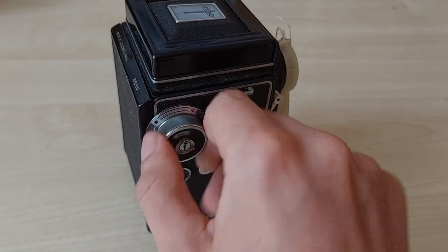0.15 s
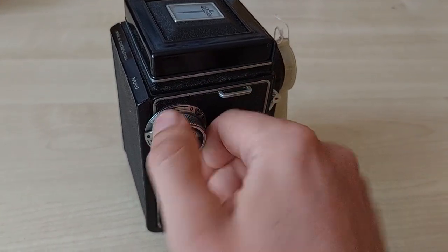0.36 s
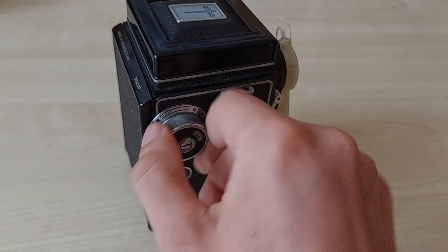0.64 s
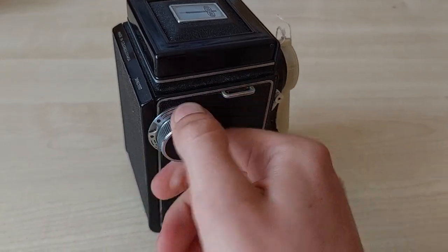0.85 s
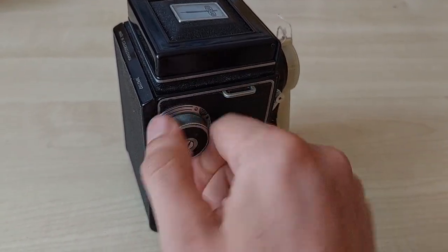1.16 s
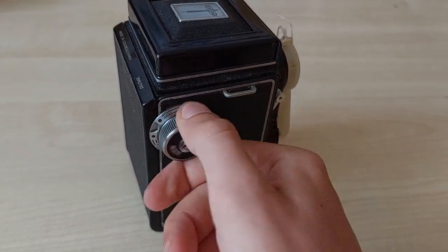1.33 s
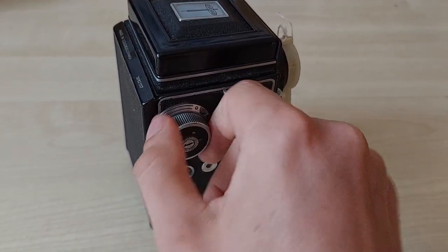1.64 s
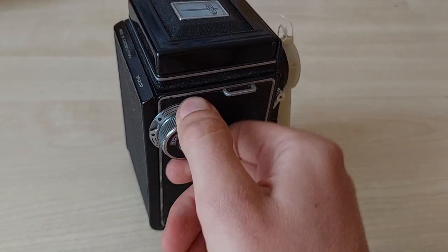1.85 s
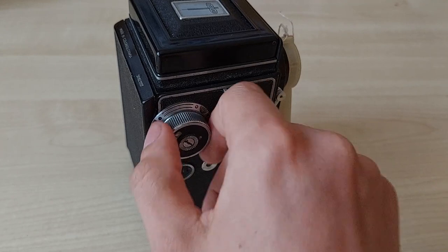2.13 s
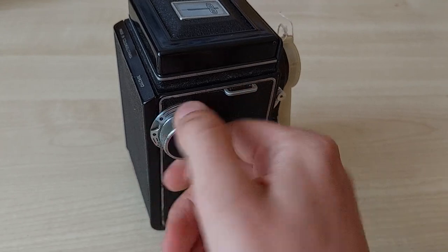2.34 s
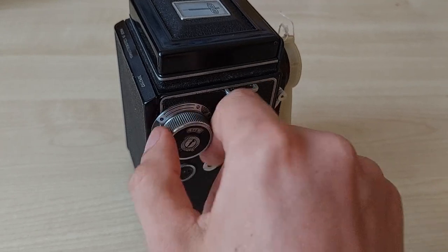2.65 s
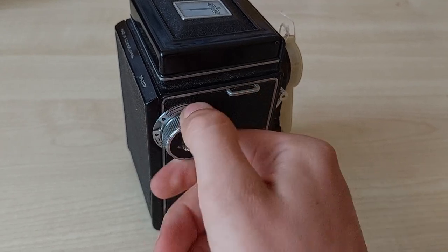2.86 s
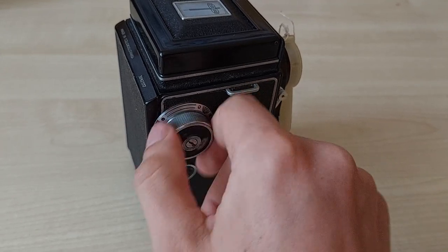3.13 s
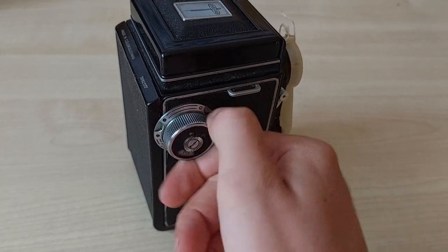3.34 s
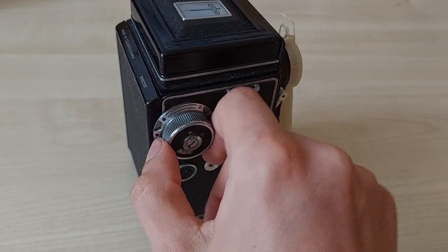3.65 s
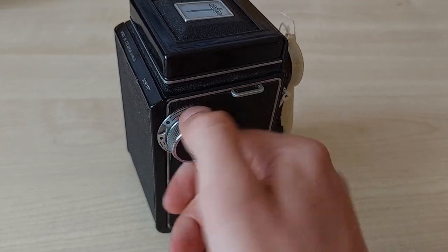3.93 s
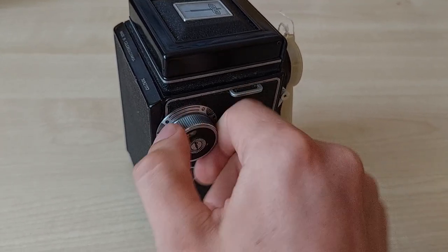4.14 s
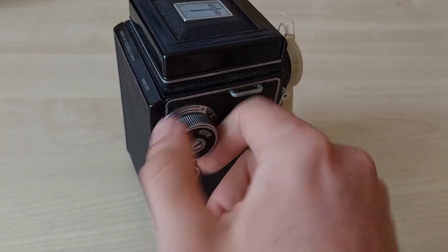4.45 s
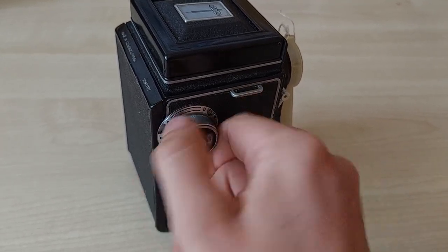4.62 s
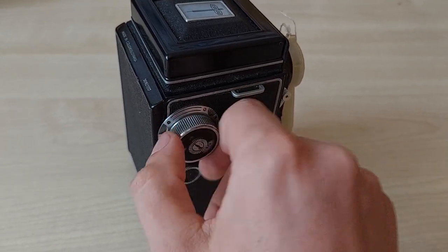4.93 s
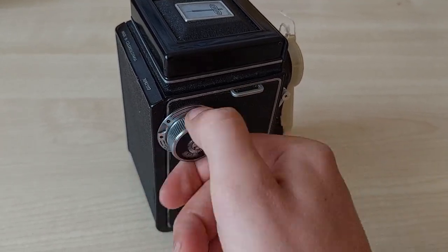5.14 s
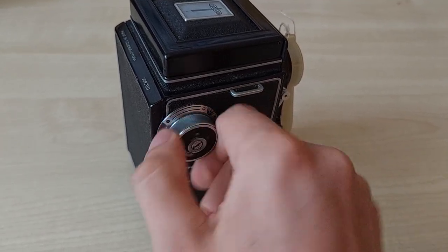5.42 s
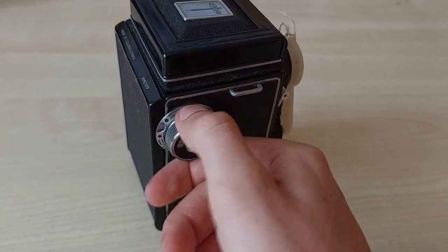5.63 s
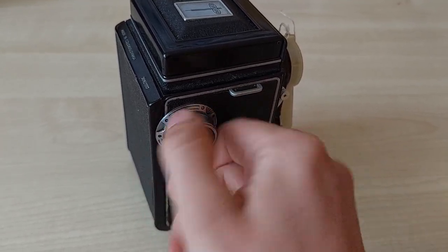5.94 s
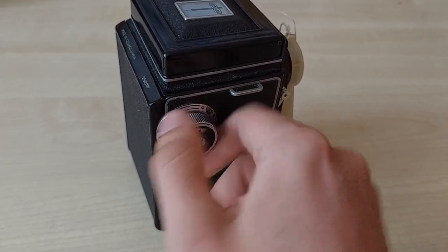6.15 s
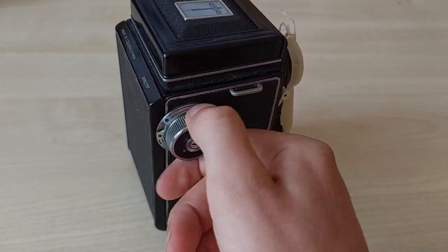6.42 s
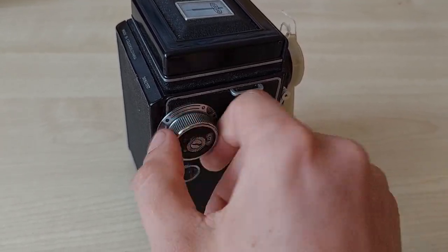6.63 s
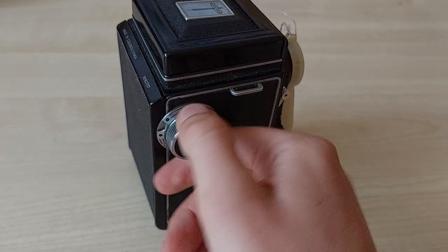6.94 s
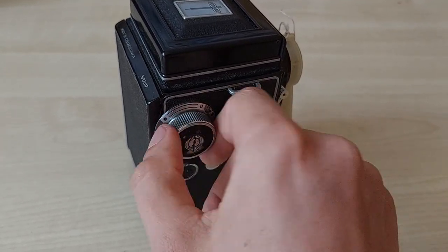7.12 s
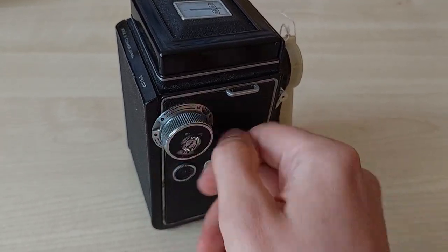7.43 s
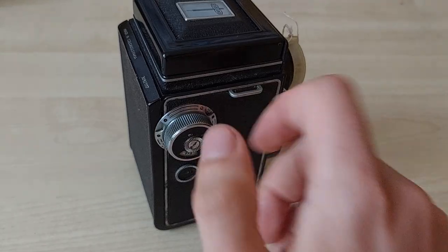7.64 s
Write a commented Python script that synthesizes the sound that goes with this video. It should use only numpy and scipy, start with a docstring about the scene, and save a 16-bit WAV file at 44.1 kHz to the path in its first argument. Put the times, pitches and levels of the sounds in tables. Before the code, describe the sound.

A hand winds a small camera's knob in short twists, with dry gear rub, uneven ratchet ticks and sharp metallic snaps on a wooden table.

```python
"""In a quiet room, on a wooden table, a hand winds the knurled knob of a small box camera.
Twists rub film and gears: random slips excite the resonances of metal and case. The ratchet pawl
ticks and now and then snaps: brief contacts set the metal ringing and knock the side plate.
Dull knocks ring as modes of the table top, cut short, over room tone and microphone hiss. In the close
stereo pair the camera reaches the left first, the table the right; the level fades down at the end."""
import sys
import numpy as np
from scipy import signal
from scipy.fft import rfft, irfft
from scipy.io import wavfile

SR = 44100
rng = np.random.default_rng(int(sys.argv[2]) if len(sys.argv) > 2 else 0)


def pcm_store(signal):
    """Save signal as 16-bit PCM."""
    levels = np.round(np.clip(np.atleast_2d(signal), -1, 1) * 32767)
    wavfile.write(sys.argv[1], SR, levels.astype(np.int16).T)


N = 343098
TIME = np.arange(N) / SR

# All levels are relative: the layers add their own trims.
# Room tone and microphone hiss, spectrum: hz, level_db
QUIET_SPECTRUM = [(15, -46.5), (25, -19), (55, 4), (123, -1), (179, -6), (248, -5), (425, -19),
                  (473, -15.5), (710, -17), (1010, -22), (3490, -30), (11100, -30.5), (15800, -32)]
# Modes of the table top: hz, level_db, t60_s (before the ringing is cut short)
TABLE_MODES = [(61.6, -19.5, .5), (110.2, -16, 0.72), (121.96, 2, 0.29), (171.7, -14, 0.31),
               (206.3, -5, 0.25), (230.5, -7.5, 0.5), (259, -10, 0.24), (291.6, -3.5, 0.28),
               (322.3, -7.5, 0.26), (422.4, -12.5, 0.11), (453, -22, 0.32), (645, -16.5, 0.11)]
# Dull knocks through the table: start_s, level_db
THUDS = [(0.117, -17), (0.621, -33.5), (1.286, -35.5), (1.708, -18.5), (2.01, -44.5), (2.832, -40),
         (3.297, -32.5), (3.731, -33.5), (4.461, -43), (4.892, -40.5), (5.206, -34), (6.93, -39.5),
         (7.231, -17), (7.468, -18.5)]
# Fingers let go and grip the knurl again: start_s, skin_hiss_db, case_hum_db, table_tremor_db
GRIPS = [(.44, -76.5, -69, -62), (1.51, -63.5, -78, -62.5), (2.03, -93, -94, -58.5),
         (2.53, -83.5, -80, -60.5), (3.01, -75, -72.5, -74.5), (3.51, -71, -84, -63),
         (4.03, -82, -78, -70.5), (4.46, -74.5, -77.5, -60.5), (4.86, -73.5, -69, -58),
         (5.77, -70.5, -81.5, -59.5), (6.19, -71, -82, -60), (6.62, -72.5, -82, -63.5)]
# Skin sliding on the knurl, resonances: hz, width_hz, level_db
SKIN_MODES = [(5260, 1400, -7.5), (6900, 340, 2), (8300, 1500, 1.5)]
# Twists of the knob: start_s, length_s, gear_and_film_rub_db, case_hum_db, table_tremor_db
TWISTS = [(.19, .14, -56, -63, -72), (.69, 0.18, -61.5, -59.5, -65.5), (1.21, 0.12, -56.5, -52, -62),
          (1.72, .14, -61, -62, -66), (2.25, 0.14, -63.5, -59.5, -62), (2.82, 0.023, -52.5, -54, -58),
          (3.25, 0.091, -55.5, -53, -57), (3.79, 0.11, -57, -56.5, -60), (4.28, 0.03, -54.5, -58, -70.5),
          (4.68, 0.042, -59.5, -59.5, -66), (5.08, 0.2, -62, -63, -55.5), (5.52, 0.075, -59.5, -59, -60.5),
          (5.97, 0.074, -56.5, -58.5, -79.5), (6.4, .05, -58, -56, -62), (6.84, 0.19, -57.5, -59, -58.5),
          (7.26, .17, -58, -54, -47.5)]
# Hollow case, resonances: hz, width_hz, level_db
CASE_MODES = [(669.4, 160, -11), (858, 77, 1.5), (1310, 130, -7.5), (1950, 300, -9.5)]
# Gears, pawl and knob, middle resonances: hz, width_hz, level_db
METAL_MODES = [(3850, 93, -17), (4700, 80, 1.5), (4824, 960, -7), (5230, 870, -16), (7700, 120, -9.5),
               (8390, 310, -7), (9370, 1100, -2.5)]
# Gears, pawl and knob, top resonances: hz, width_hz, level_db
METAL_TOP_MODES = [(11050, 600, -4), (13110, 410, 1), (13700, 210, -10), (13400, 590, -5),
                   (15500, 940, -9.5)]
# Side plate under a blow, resonances: hz, width_hz, level_db
PLATE_MODES = [(742, 170, -4), (1277, 182, 3.5), (1337, 250, 0), (2115, 450, -7.5)]
# Pawl ticks and snaps: start_s, level_db, case_knock_db and top_treble_db (both re level_db)
TICKS = [(0.117, -60, -5, -13), (0.195, -36.5, -2.5, -32), (0.227, -32, -34, -15),
         (0.3292, -37, -15, -14.5), (0.5198, -53.5, -21, -17), (0.621, -55, -11, -18),
         (0.8519, -28.5, -16.5, -12.5), (1.2332, -20.5, -19, -19), (1.2896, -11.5, -16.5, -1.5),
         (1.7036, -34, -14, -32), (1.973, -54, -13, -25), (2.186, -49.5, -8.5, -29),
         (2.2562, -36, -22, -13), (2.285, -32.5, -23, -14), (2.3725, -41, -27, -11),
         (2.3987, -31, -21, -15), (2.5267, -50, -10, -25), (2.817, -40, -27, -4.5),
         (3.1263, -47.5, -12, -12), (3.2562, -22.5, -14, -12.5), (3.274, -33, -41, -9.5),
         (3.2994, -41, 15, -20), (3.3228, -22.5, -14.5, -13), (3.597, -62, 4.5, -13),
         (3.7319, -16.5, -19, 0), (3.9285, -39, -9.5, -18.5), (4.2626, -38.5, -35, -21),
         (4.2962, -32, -14, -7), (4.59, -54.5, -4, -16), (4.6608, -43.5, -35, -10.5), (4.6867, -45, -9, -5),
         (4.8528, -42, -7, -9), (5.023, -55.5, 0.5, -20), (5.097, -22.5, -9.5, -22),
         (5.1107, -28.5, -16, -6.5), (5.122, -33.5, -9, -24), (5.1356, -39.5, 13.5, -23),
         (5.1555, -18, -22.5, -16), (5.207, -14, -15.5, -1), (5.447, -48.5, -11, -15),
         (5.4803, -39, -39, -11.5), (5.5275, -32, -16.5, -9), (5.583, -36.5, -8, -9.5),
         (5.9674, -38.5, -8.5, -22), (5.981, -40.5, -16, -10), (6.061, -35, -13, -35),
         (6.312, -47.5, -26.5, -28.5), (6.403, -34, -40, -11.5), (6.55, -47.5, -9.5, -14),
         (6.742, -43, -11.5, -33), (6.855, -22, -11.5, -23), (6.9097, -49, 16.5, -12),
         (6.9294, -10.5, -8, -2), (7.217, -59, -16.5, -17), (7.305, -32.5, -6.5, -9),
         (7.3105, -11, -9, -3.5), (7.4172, -36, 1, -25)]
# Stereo balance of ticks and snaps: hz, left_minus_right_db
TICK_BALANCE = [(60, -1.5), (110, 6.5), (200, -2), (380, 2.5), (700, 0), (1290, 1.5), (2380, 5.5),
                (4400, 9), (8120, 8), (15000, 1.5)]
# Stereo balance of rubbing: hz, left_minus_right_db
RUB_BALANCE = [(60, 9), (110, 5.5), (200, 0), (380, 6), (700, -1.5), (1290, 3), (2380, 12.5), (4400, 5),
               (8120, 12), (15000, 1)]
# Reverberation time of the room: hz, t60_s
ROOM_T60 = [(200, 0.37), (530, 0.26), (1390, 0.2), (3680, 0.24), (9700, 0.12)]
# Closing fade: time_s, gain_db
FADE = [(7.5, -1.5), (7.62, -2.5), (7.78, -12.5)]

QUIET_DB, QUIET_LEFT_DB = -60, 3.5
RUB_RISE_DB_PER_S, RUB_FALL_DB_PER_S = 380.5, 252
HUM_RISE_DB_PER_S, HUM_FALL_DB_PER_S = 350, 201.5
TREMOR_RISE_DB_PER_S, TREMOR_FALL_DB_PER_S = 201, 109
GRIP_S, GRIP_EDGE_DB_PER_S = 0.032, 500
# loose parts re the tick: more after bright snaps and, relatively, after soft ticks
RATTLE_DB, RATTLE_BRIGHT_SHARE, RATTLE_SOFT_SHARE = -28.5, 1.65, 0.68
CAMERA_LEFT_LAG_S = -0.00015   # negative: the left channel leads
TABLE_LEFT_LAG_S, TABLE_LEFT_DB = 0.00018, 1.2   # the right channel leads
CUTOFF_HZ = 15750


def from_db(db):
    """Decibel law: amplitude gain of a level in dB."""
    return 10 ** (np.asarray(db) / 20)


def rms_one(x):
    """Normalization of mean power: scales to rms 1."""
    return x / np.sqrt(np.mean(x ** 2) + 1e-20)


def at_hz(points, hz):
    """Interpolation of a (hz, value) table along a logarithmic frequency axis."""
    table_hz, values = np.transpose(points)
    return np.interp(np.log(np.maximum(hz, 1)), np.log(table_hz), values)


def shaped(x, gain):
    """Linear filtering: multiplies the spectrum by a gain that is a function of frequency."""
    return irfft(rfft(x) * gain(np.fft.rfftfreq(N, 1 / SR)), N)


def passed(x, hz, kind):
    """Second-order high- or low-pass filtering."""
    return signal.sosfilt(signal.butter(2, hz, kind, fs=SR, output="sos"), x + 1e-18)


def drift(rate):
    """Random fluctuation: normal values drawn rate times a second, joined by straight lines."""
    knots = rng.standard_normal(int(N / SR * rate) + 2)
    return np.interp(TIME * rate, np.arange(len(knots)), knots)


def resonate(x, modes, broad_db):
    """Modal superposition: parallel resonances of alternating sign over a broad leak."""
    out = from_db(broad_db) * x
    for k, (hz, width_hz, db) in enumerate(modes):
        radius = np.exp(-np.pi * width_hz / SR)
        zeros = from_db(db) * (1 - radius ** 2) / 2 * np.array([1, 0, -1])
        poles = [1, -2 * radius * np.cos(2 * np.pi * hz / SR), radius ** 2]
        out = out + (-1) ** k * signal.lfilter(zeros, poles, x + 1e-18)
    return out


def bursts(times, db, rise_s, die_s):
    """Transient excitation: each event's envelope rises fast and dies exponentially."""
    out, t = np.zeros(N + SR), np.arange(SR // 2) / SR
    for s, gain, rise, die in zip(*np.broadcast_arrays(times, from_db(db), rise_s, die_s)):
        rising = (1 - np.exp(-t / max(rise, 1e-5))) ** 2
        out[round(s * SR):][:len(t)] += gain * rising * np.exp(-t / max(die, 1e-4))
    return out[:N]


def swell(start, length, db, rise_db_per_s, fall_db_per_s):
    """Exponential onset and release: summed gain of movements that rise, hold and fall away."""
    start, length, db = start[:, None], length[:, None], db[:, None]
    early = np.maximum(start - TIME, 0)
    late = np.maximum(TIME - start - length, 0)
    return from_db(db - rise_db_per_s * early - fall_db_per_s * late).sum(0)


def handling(column, rise_db_per_s, fall_db_per_s):
    """Common excitation: gain of a layer that twists and grips drive alike."""
    rows = np.transpose(TWISTS + [(s, GRIP_S, *db) for s, *db in GRIPS])
    return swell(rows[0], rows[1], rows[column], rise_db_per_s, fall_db_per_s)


def quiet():
    """Partial coherence: stationary noise shared most in the bass, its level wavering slightly."""
    def alike(hz):
        return from_db(at_hz(QUIET_SPECTRUM, hz)) / np.sqrt(1 + (hz / 900) ** 2)

    def apart(hz):
        treble = 1 / (1 + (900 / np.maximum(hz, 1)) ** 2)
        return from_db(at_hz(QUIET_SPECTRUM, hz)) * np.sqrt(1.4 + treble)

    shared = shaped(rng.standard_normal(N), alike)
    tone = shared + shaped(rng.standard_normal((2, N)), apart)
    channel_db = QUIET_LEFT_DB * np.array([[0.5], [-0.5]])
    return from_db(QUIET_DB + channel_db + 0.78 * drift(1.7)) * rms_one(tone)


def tremor():
    """Forced vibration: the working hand keeps the modes of the table top murmuring."""
    modes = [(hz, 4.8 / t60, db) for hz, db, t60 in TABLE_MODES]
    gain = handling(column=4, rise_db_per_s=TREMOR_RISE_DB_PER_S, fall_db_per_s=TREMOR_FALL_DB_PER_S)
    murmur = rms_one(resonate(rng.standard_normal(N), modes, broad_db=-77.5))
    return gain * from_db(0.84 * drift(11)) * murmur


def thuds():
    """Free vibration: table modes build over a few cycles and ring, cut short; a woody scuff joins."""
    out, t = np.zeros(N + SR), np.arange(SR // 2) / SR
    hz, level_db, t60 = np.transpose(TABLE_MODES)[:, :, None]
    spread = rng.standard_normal((len(THUDS), len(TABLE_MODES), 1))
    buildup = 1 - np.exp(-t * hz / 2.3)
    # the ringing is cut short, below 170 Hz a little earlier
    cut_short = 1 / (1 + (t / np.where(hz < 170, 0.13, 0.18)) ** 9)
    for (s, db), own in zip(THUDS, spread):
        decay = from_db(level_db + 1.4 * own - 60 * t / t60)
        modes = decay * buildup * cut_short * np.sin(2 * np.pi * hz * t)
        out[round(s * SR):][:len(t)] += from_db(db - 4.0) * modes.sum(0)
    s, db = np.transpose(THUDS)
    scuff = passed(passed(rng.standard_normal(N), 310, "high"), 630, "low")
    return out[:N] + rms_one(scuff) * bursts(s, db - 21, 0.00095, 0.044)


def grips():
    """Sliding friction: fingertips move off and onto the knurl with a short, thin hiss."""
    s, db = np.transpose(GRIPS)[:2]
    skin = passed(rng.standard_normal(N), 3000, "high")
    hiss = rms_one(resonate(skin, SKIN_MODES, broad_db=-6.5))
    gain = swell(s, np.full(len(s), GRIP_S), db, GRIP_EDGE_DB_PER_S, GRIP_EDGE_DB_PER_S)
    return gain * from_db(2.8 * drift(52)) * hiss


def metal(mid, top):
    """Modal response: the mechanism rings in two groups of modes, each with its own drive."""
    mid_band = passed(passed(mid, 1900, "high"), 10000, "low")
    return (resonate(mid_band, METAL_MODES, broad_db=-9.5)
            + resonate(passed(top, 11000, "high"), METAL_TOP_MODES, broad_db=-7.5))


def winding():
    """Frictional excitation: uneven slips of gear teeth and film drive the metal and the case."""
    rubbing = swell(*np.transpose(TWISTS)[:3], RUB_RISE_DB_PER_S, RUB_FALL_DB_PER_S)
    humming = handling(column=3, rise_db_per_s=HUM_RISE_DB_PER_S, fall_db_per_s=HUM_FALL_DB_PER_S)
    uneven_db = 5.6 * np.minimum(rng.exponential(1, (2, N)), 5)
    slips = rng.standard_normal((2, N)) * from_db(uneven_db)
    soft = resonate(slips[0], [(5000, 1800, 0)], broad_db=-9)
    thin = from_db(-14.5) * passed(slips[0], 4000, "high")
    rub = rms_one(metal(soft, from_db(-4.0) * soft) + thin)
    dull = passed(slips[1], 1500, "low")
    # the level of each case resonance wanders slowly at random
    case = rms_one(sum(from_db(2.5 * drift(5.7)) * resonate(dull, [mode], broad_db=-38)
                       for mode in CASE_MODES))
    flutter_db = 1.1 * drift(90)   # the level of rub and hum flutters quickly at random
    return from_db(flutter_db) * (rubbing * rub + humming * case)


def pawl():
    """Impact excitation: brief uneven contact, longer when harder, then loose parts rattle on."""
    s, db, knock_db, top_db = np.transpose(TICKS)
    rattle_db = RATTLE_DB + RATTLE_BRIGHT_SHARE * top_db - RATTLE_SOFT_SHARE * db
    hard = from_db(0.063 * (db + 21.0))
    uneven_db = 2.18 * np.minimum(rng.exponential(1, N), 5)
    contact = rng.choice([-1., 1.], (3, N)) * from_db(uneven_db)

    def hit(level_db):
        tick = bursts(s, level_db, 0.00077 * hard, 0.0024 * hard)
        return tick + bursts(s, level_db + rattle_db, 0.0012, 0.032)

    steel = metal(contact[0] * hit(db + 7), contact[1] * hit(db + top_db + 10.5))
    # the side plate takes one short shove, then shaking
    push = bursts(s, db + knock_db + 32, 0.00007, 0.00012)
    shake = contact[2] * bursts(s, db + knock_db + 5.5, 0.001, 0.0099)
    return steel + resonate(passed(push, 500, "high") + shake, PLATE_MODES, broad_db=-33.5)


def pair(x, balance, lag_s):
    """Interchannel time and level differences: a small lag, and a colour for each microphone."""
    def left_gain(hz):
        return from_db(at_hz(balance, hz) / 2) * np.exp(-2j * np.pi * hz * lag_s)

    def right_gain(hz):
        return from_db(-at_hz(balance, hz) / 2)

    return np.array([shaped(x, left_gain), shaped(x, right_gain)])


def room(x):
    """Reverberant decay: noise that dies band by band, partly its own in each channel."""
    t, tail = np.arange(SR // 2) / SR, 0
    edges = 60 * 2 ** np.arange(0, 8.1, 0.5)   # half-octave bands, in Hz
    for low, high in zip(edges, edges[1:]):
        white = rng.standard_normal((3, len(t)))
        band_filter = signal.butter(2, [low, high * 1.1], "band", fs=SR, output="sos")
        band = signal.sosfilt(band_filter, white)
        decay = from_db(-60 * t / at_hz(ROOM_T60, np.sqrt(low * high)))
        tail = tail + (band[:2] + 0.66 * band[2]) * decay
    tail = tail * (1 - np.exp(-t / 0.0028)) / np.sqrt(np.sum(tail ** 2))
    return signal.fftconvolve(x[None], tail, axes=1)[:, :N]


def scene():
    """Superposition: camera and table, direct and through the room, over the room tone."""
    background = quiet()
    wood = thuds() + tremor()
    rubs = winding() + grips()
    ticks = pawl()
    direct = (pair(ticks, TICK_BALANCE, CAMERA_LEFT_LAG_S)
              + pair(rubs, RUB_BALANCE, CAMERA_LEFT_LAG_S)
              + pair(wood, [(1, TABLE_LEFT_DB)], TABLE_LEFT_LAG_S))
    reverberant = room(from_db(-2.0) * (ticks + rubs) + from_db(-8) * wood)
    return direct + reverberant + background


def record(dry):
    """Band limitation: the level fades down at the end and a steep low-pass cuts the top."""
    faded = dry * from_db(np.interp(TIME, *np.transpose(FADE)))
    low_pass = signal.ellip(12, 0.3, 70, CUTOFF_HZ, fs=SR, output="sos")
    return signal.sosfilt(low_pass, faded)


dry = scene()
out = record(dry)
pcm_store(out)
```